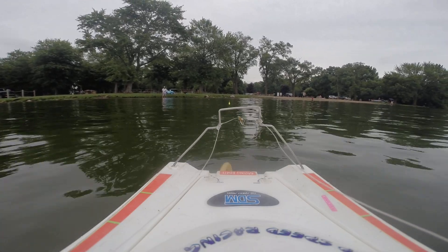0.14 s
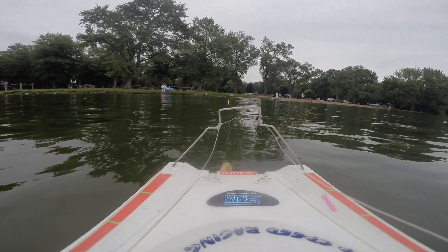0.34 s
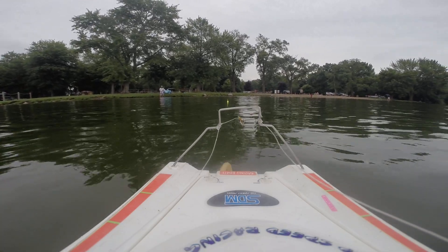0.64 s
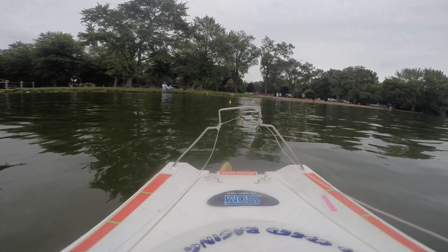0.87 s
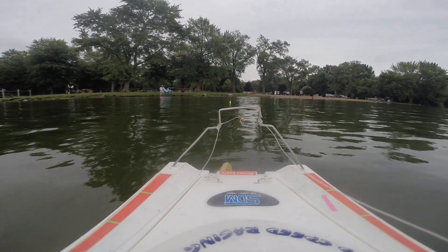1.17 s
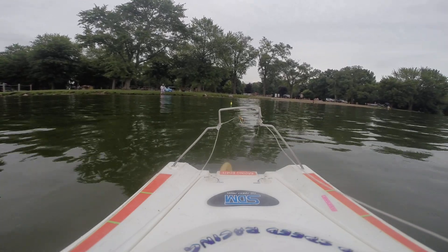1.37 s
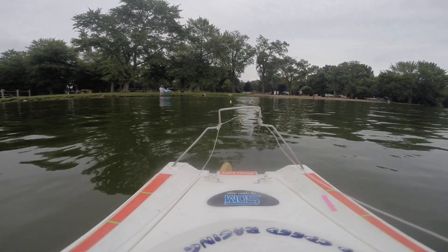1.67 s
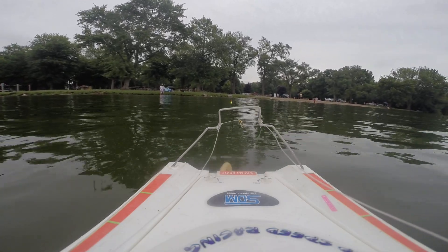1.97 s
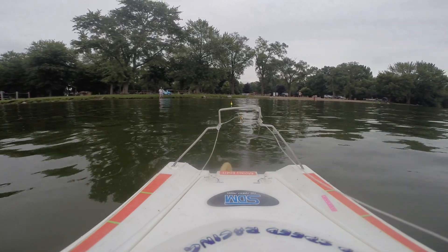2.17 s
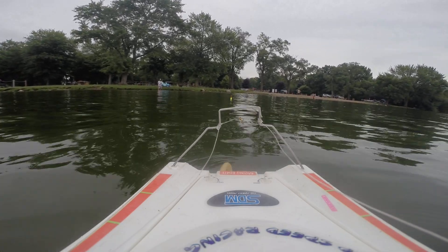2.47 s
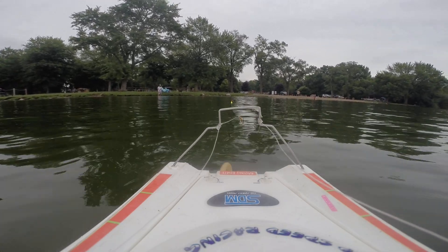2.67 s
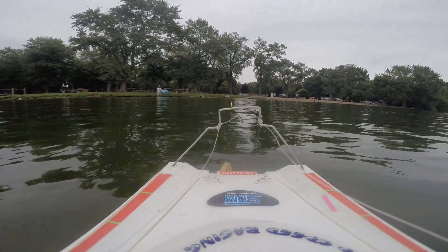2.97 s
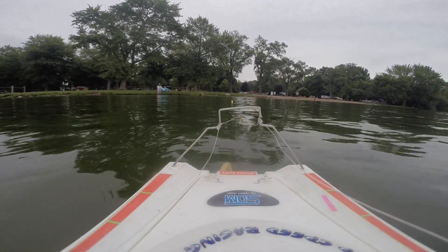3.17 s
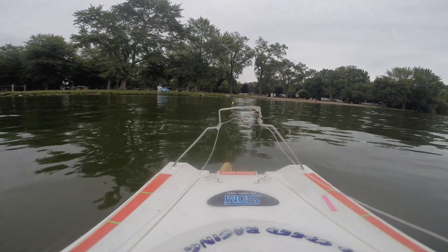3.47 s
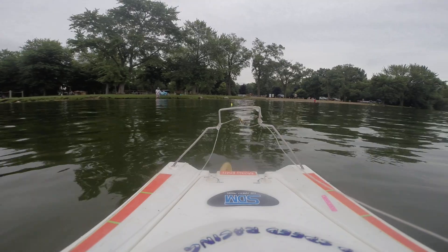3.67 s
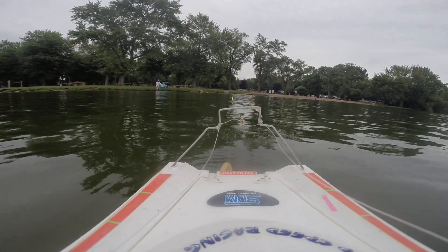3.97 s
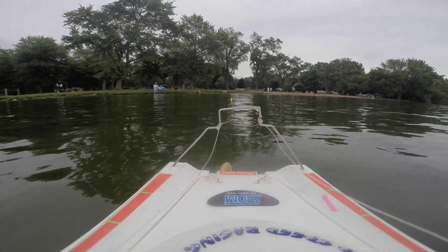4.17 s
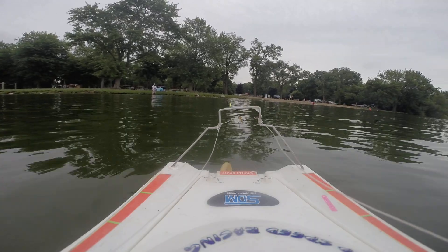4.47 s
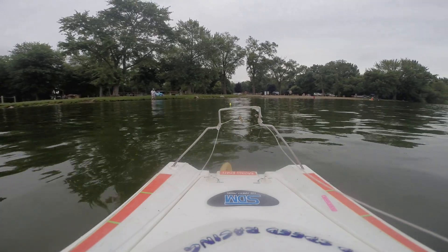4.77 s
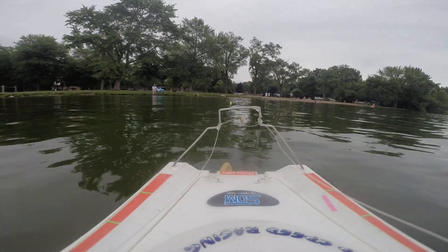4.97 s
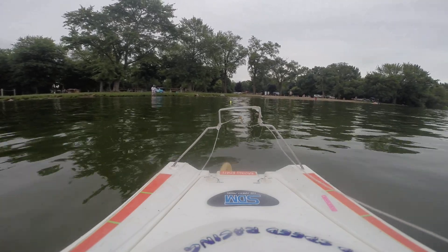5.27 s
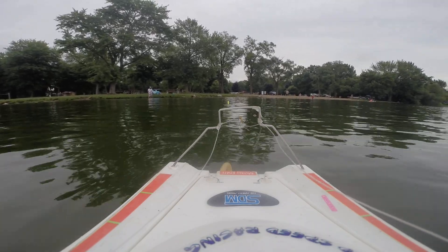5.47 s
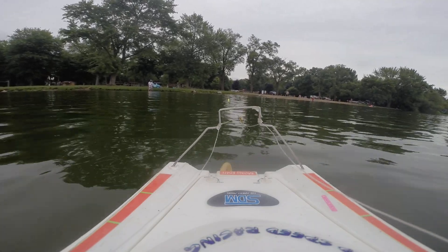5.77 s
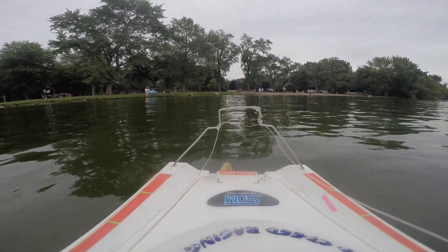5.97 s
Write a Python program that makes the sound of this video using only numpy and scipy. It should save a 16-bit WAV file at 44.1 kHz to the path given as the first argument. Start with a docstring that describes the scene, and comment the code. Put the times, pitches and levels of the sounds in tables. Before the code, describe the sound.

A model boat's small servo motor buzzes with a rapid, hollow rattle, then stops dead, leaving soft open-air rumble and a faint distant whine.

```python
"""On a calm lake, a model boat drifts with a small camera on its deck. A little servo motor, kicked
45 times a second, knocks its gears together and buzzes through the hollow hull. A gear tooth snaps
now and then, lapping ripples make the motor's case ring out, and near the end the motor stops dead.
The open air rumbles and the electronics whistle thinly throughout. Faint, high chirps come early on,
and a distant, wavering whine swells twice in the second half."""
import sys
import numpy as np
from scipy import signal
from scipy.fft import rfft, irfft
from scipy.io import wavfile
from scipy.ndimage import uniform_filter1d

SR = 44100
rng = np.random.default_rng(int(sys.argv[2]) if len(sys.argv) > 2 else 0)


def int16_out(signal):
    """Quantize to a 16-bit WAV file."""
    q = np.round(np.clip(np.atleast_2d(signal).T, -1, 1) * 32767)
    wavfile.write(sys.argv[1], SR, q.astype(np.int16))


N = 269892

KICK_HZ, FIRST_KICK_S, STOP_S = 45.4232, .01231, 5.57  # the motor's kicks: rate, start and stop

# The open air over the lake, from bass to treble (frequency [Hz], level [dB per Hz])
AIR_SPECTRUM = [(15, -86), (30, -81), (40, -81.5), (60, -80), (150, -82), (250, -85), (500, -89.5),
                (1000, -94.5), (2000, -94.5), (3000, -103), (5000, -105.5), (7000, -110), (10000, -115),
                (15000, -118)]
# Steady whistles of the electronics (pitch [Hz], level [dB rms])
WHISTLE_TONES = [(5856, -84.5), (8780, -84.5), (11719, -87.5), (14626, -81.5)]
# Low tones of the shaking hull (multiple of the kick rate [-], level [dB rms])
SHUDDER_TONES = [(1, -65), (2, -72.5), (3, -67), (4, -77), (5, -78)]
# Notes at which the hull and the motor's case ring (pitch [Hz], width [Hz], gain [dB])
HULL_RINGS = [(903, 25, -16), (1077, 260, -17.0), (1383, 12.5, -4), (1543.5, 177, 3.5), (1571, 167, 5.5),
              (1856, 17, -9), (2066, 47.5, 0), (2186, 52.5, 0), (2342, 25, -10), (2509.5, 76, -3.5),
              (2615, 310, -16), (2690, 61, -9.5), (2886, 68, -2), (3154, 52, -15.5), (3273, 57, -15),
              (3620, 84, -9), (3790, 66.5, -4), (4160, 88, -15), (4497, 82, -15), (4970, 108, -22.5),
              (5403, 124, -16), (5655, 200, -20.5), (6070, 135, -26.5), (6800, 210, -27.5),
              (7300, 320, -36)]
# Gear teeth snapping over, each at the nearest kick (time [s], strength [dB])
TOOTH_SNAPS = [(.035, -14), (.079, -7), (.167, -10), (.211, -11), (.343, -6), (2.237, -11), (2.325, -12),
               (2.369, -9), (3.029, -3), (3.117, -7)]
# Ripples lapping the hull (start [s], length [s], swell of the case's ring [dB])
LAPPING_RIPPLES = [(.68, .22, 9.5), (.91, 0.2, 8), (1.105, .21, 9), (1.34, 0.18, 4), (1.56, 0.2, 7.5),
                   (2.032, 0.22, 4), (2.23, 0.24, 9.5), (2.7, 0.25, 8), (3.33, .18, 10.5),
                   (3.522, 0.21, 6.5), (3.71, 0.22, 12), (3.956, 0.16, 7), (4.23, 0.25, 9.5),
                   (4.83, 0.26, 10), (5.08, .26, 4.5), (5.444, 0.31, 8)]
# Tones of the distant whine
# (start [s], length [s], first pitch [Hz], halfway pitch [Hz], last pitch [Hz], level [dB])
WHINE_TONES = [(3.05, 1.4, 1890, 2067, 1900, -66), (3.25, 1.2, 2150, 2326, 2200, -65),
               (5.449, .85, 1630, 1723, 1790, -67.5), (5.599, 0.82, 1785, 1832, 1800, -63.5),
               (5.579, .8, 2185, 2270, 2280, -67.5), (5.652, 0.13, 2760, 2710, 2730, -69)]


def undb(db):
    """Turn decibels into a number to multiply by."""
    return 10 ** (np.asarray(db) / 20)


def resonate(x, hz, width_hz):
    """Let a sound ring at one pitch, which passes at full strength."""
    return signal.lfilter(*signal.iirpeak(hz, hz / width_hz, fs=SR), x + 1e-18)


def swell(x, hz, width_hz, db):
    """Turn the band around one pitch up or down by a moving level."""
    return x + (undb(db) - 1) * resonate(x, hz, width_hz)


def noise_band(hz, width_hz):
    """Noise gathered around one pitch, with a typical size (rms) of 1."""
    x = resonate(resonate(rng.standard_normal(N), hz, width_hz), hz, width_hz)
    return x / x.std()


def wander(rate_hz):
    """A smooth random drift with a spread of 1, taking rate_hz steps a second."""
    hold = int(SR / rate_hz)
    steps = np.repeat(rng.standard_normal(N // hold + 1), hold)
    x = uniform_filter1d(uniform_filter1d(steps, hold), hold)[:N]
    return x / x.std()


def arch(start_s, length_s, shape):
    """A rounded rise from 0 to 1 and back; a small shape flattens the top."""
    progress = (np.arange(N) / SR - start_s) / length_s
    return np.maximum(4 * progress * (1 - progress), 0) ** shape


def clicks(times, sizes, reach=6):
    """Sharp clicks, each spread over a few samples so it can fall between two of them."""
    at = np.asarray(times)[:, None] * SR
    index = at.astype(int) + np.arange(1 - reach, reach + 1)
    shape = np.sinc(index - at) * np.sinc((index - at) / reach)
    return np.bincount(np.clip(index, 0, N - 1).ravel(), (shape * sizes[:, None]).ravel(), N)


def noise_tail(hits, fade_s):
    """A fading puff of noise after each click."""
    return signal.lfilter([1], [1, -np.exp(-1 / (fade_s * SR))], hits) * rng.standard_normal(N)


def open_air(drone_hz=116, drone_db=-63, swell_db=.19):
    """The air rumbles softly, thinner towards the treble, with a low wavering drone in it."""
    hz, db = np.transpose(AIR_SPECTRUM)
    all_hz = np.arange(N // 2 + 1) * SR / N
    colour = undb(np.interp(np.log(all_hz + 1e-9), np.log(hz), db))
    rumble = irfft(rfft(rng.standard_normal(N)) * colour, N) * np.sqrt(SR / 2)
    return rumble * undb(swell_db * wander(3.03)) + undb(drone_db) * noise_band(drone_hz, width_hz=22)


def electronic_whistles(waver_hz=3):
    """The electronics give off thin, slightly unsteady tones."""
    out = 0
    for hz, db in WHISTLE_TONES:
        phase = 2 * np.pi * np.cumsum(hz + waver_hz * wander(40)) / SR
        out += undb(db) * np.sin(phase)
    return np.sqrt(2) * out


def hull_shudder():
    """The motor's recoil shakes the whole boat at the kick rate until it stops."""
    t = np.arange(N) / SR
    tones = sum(undb(db) * np.sin(2 * np.pi * (multiple * KICK_HZ * t + rng.random()))
                for multiple, db in SHUDDER_TONES)
    running = np.clip((STOP_S - t) * KICK_HZ, 0, 1)
    return np.sqrt(2) * tones * running


def gear_knocks(slack_s=.0013044, slack_db=-12, bounce_s=.001195, bounce_db=-6, scatter_db=.09,
                limp_s=25e-6, jitter_s=8e-6, scrape_db=-34, dull_above_hz=8200):
    """Each kick takes up the slack in the gears, strikes home and bounces; the teeth scrape briefly."""
    times = np.arange(FIRST_KICK_S, STOP_S, 1 / KICK_HZ)
    time_luck, blow_luck, bounce_luck = rng.standard_normal((len(times), 3)).T
    times += limp_s * (-1) ** np.arange(len(times))  # slightly long and short gaps take turns
    times += jitter_s * time_luck
    sizes = undb(-scatter_db * blow_luck)
    slack = clicks(times - slack_s, sizes * undb(slack_db))
    blows = clicks(times, sizes)
    bounce = clicks(times + bounce_s, undb(bounce_db - scatter_db * bounce_luck))
    scrape = undb(scrape_db) * noise_tail(blows, fade_s=.00099)
    # plastic teeth give a little, which dulls the blow
    soften = signal.butter(4, dull_above_hz, fs=SR, output="sos")
    return signal.sosfilt(soften, slack + blows + bounce + scrape)


def servo_buzz(roll_s=.84, roll_crest_s=2.56, roll_db=2, slosh_db=2, rattle_db=.6):
    """The gears' blows make the hull ring, and the moving water shifts its tone."""
    force = gear_knocks() + tooth_snaps()
    # neighbouring rings swing in opposite directions
    buzz = sum((-1) ** k * undb(db) * resonate(force, hz, width_hz)
               for k, (hz, width_hz, db) in enumerate(HULL_RINGS))
    # the low side of the deck's ring follows the boat's gentle roll
    roll = np.cos(2 * np.pi * (np.arange(N) / SR - roll_crest_s) / roll_s)
    buzz = swell(buzz, hz=1490, width_hz=70, db=roll_db * roll)
    # its high side and the bright rattle waver as the water sloshes
    buzz = swell(buzz, hz=1690, width_hz=70, db=slosh_db * wander(7))
    return swell(buzz, hz=3900, width_hz=700, db=rattle_db * wander(6))


def high_chirps(start_s=.026, end_s=2.48, gap_s=.14, jitter_s=.018, length_s=.035, level_db=-77):
    """Faint, hissy chirps in two very high bands come at slightly uneven gaps."""
    t = np.arange(N) / SR
    hiss = noise_band(10500, width_hz=1200) + undb(-2) * noise_band(13200, width_hz=1200)
    times = np.arange(start_s, end_s, gap_s)
    times += jitter_s * rng.standard_normal(len(times))
    bursts = sum(np.exp(-np.minimum((2 * (t - at) / length_s) ** 6, 20)) for at in times)  # flat-topped
    return undb(level_db) * bursts * hiss


def tooth_snaps(late_s=.000485, crunch_db=-16):
    """A gear tooth slips over just after a kick: a dry click with a short crunch."""
    times, strength_db = np.transpose(TOOTH_SNAPS)
    nearest_kick = np.round((times - FIRST_KICK_S) * KICK_HZ)
    click = clicks(FIRST_KICK_S + nearest_kick / KICK_HZ + late_s, undb(strength_db))
    crunch = undb(crunch_db) * noise_tail(click, fade_s=.00077)
    return resonate(click + crunch, hz=3700, width_hz=2600)


def ripples(buzz, case_hz=2700, resting_db=-2):
    """Ripples lap the hull, and the motor's case rings out in the buzz while each one passes."""
    lapping_db = sum(db * arch(start_s, length_s, shape=.62) for start_s, length_s, db in LAPPING_RIPPLES)
    return swell(buzz, case_hz, width_hz=110, db=resting_db + lapping_db)


def distant_whine(waver=.008, flutter_hz=90, blur_hz=400, blur_db=-1):
    """Far-off tones swell, bend in pitch and fade, fluttering and blurred on their way over the water."""
    out = 0
    for start_s, length_s, first_hz, halfway_hz, last_hz, db in WHINE_TONES:
        glide_hz = np.interp(np.arange(N) / SR, [start_s, start_s + length_s], [first_hz, last_hz])
        bend_hz = (halfway_hz - (first_hz + last_hz) / 2) * arch(start_s, length_s, shape=.99)
        hz = (glide_hz + bend_hz) * (1 + waver * wander(20))
        phase = 2 * np.pi * np.cumsum(hz) / SR
        flutter = wander(flutter_hz) * np.cos(phase)
        blur = undb(blur_db) * wander(blur_hz) * np.sin(phase)
        out += undb(db) * arch(start_s, length_s, shape=.54) * (flutter + blur)
    return out


def scene():
    """Everything as it reaches the deck, in one channel."""
    motor = ripples(servo_buzz()) + hull_shudder()
    return (motor + distant_whine() + electronic_whistles() + open_air() + high_chirps())[None]


def record(dry, top_hz=15100):
    """The camera cuts off the highest treble."""
    return signal.sosfilt(signal.ellip(10, .1, 70, top_hz, fs=SR, output="sos"), dry)


dry = scene()
out = record(dry)
int16_out(out)
```